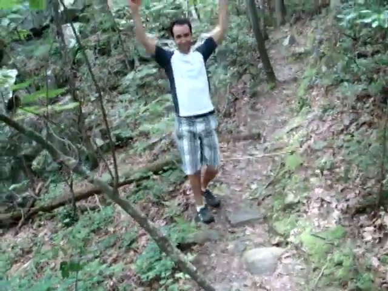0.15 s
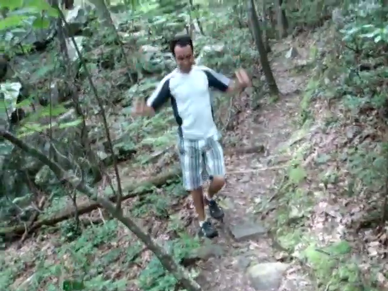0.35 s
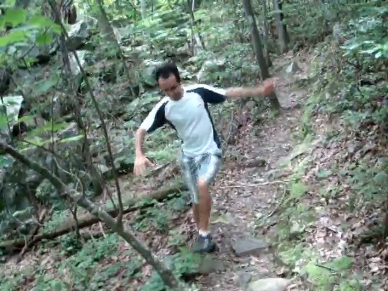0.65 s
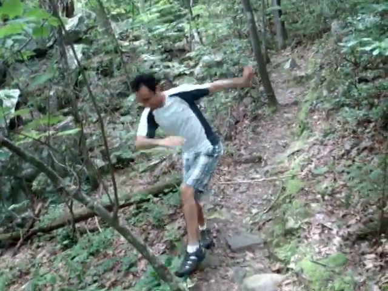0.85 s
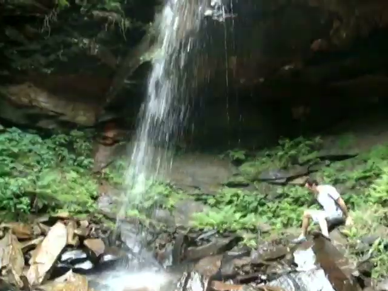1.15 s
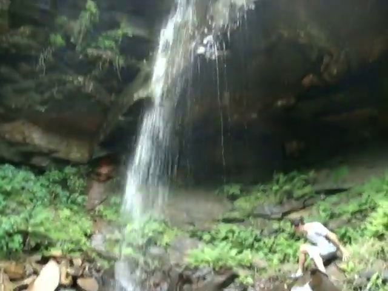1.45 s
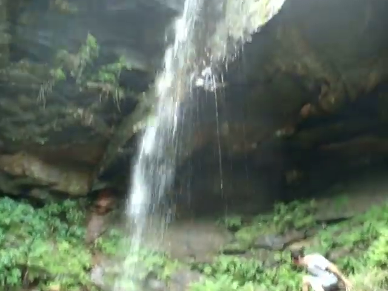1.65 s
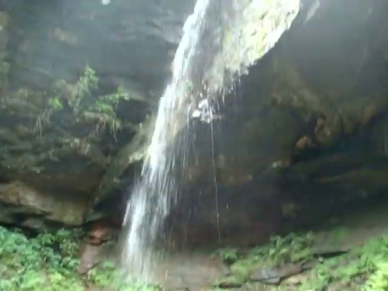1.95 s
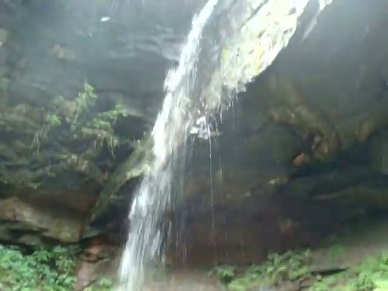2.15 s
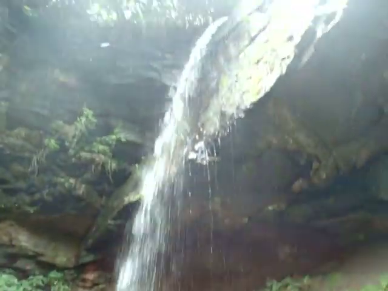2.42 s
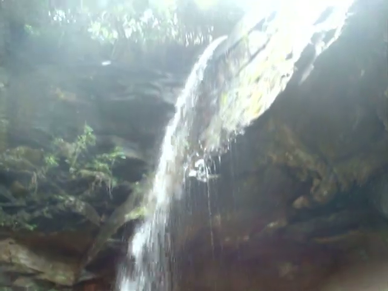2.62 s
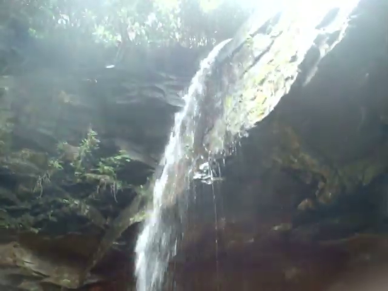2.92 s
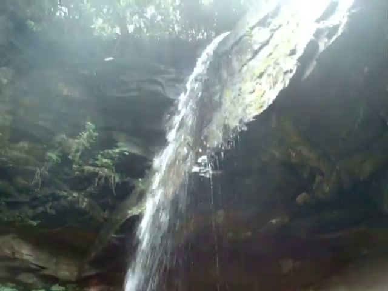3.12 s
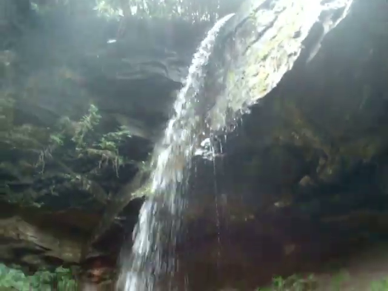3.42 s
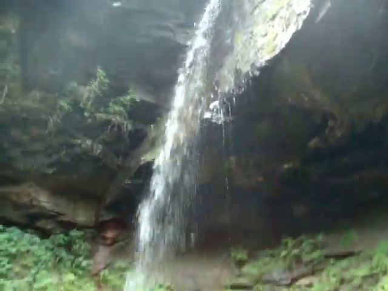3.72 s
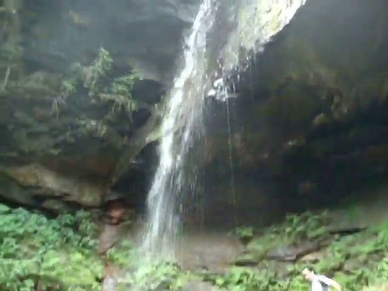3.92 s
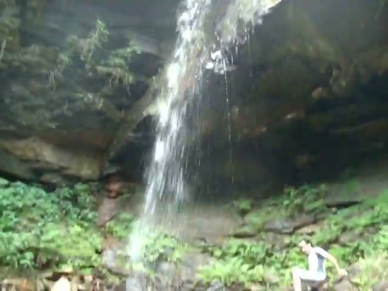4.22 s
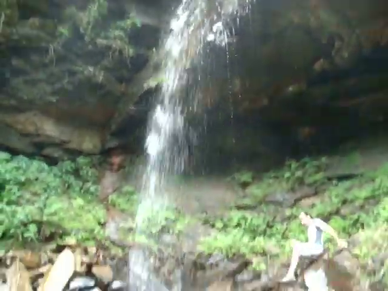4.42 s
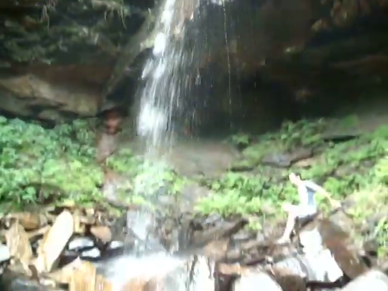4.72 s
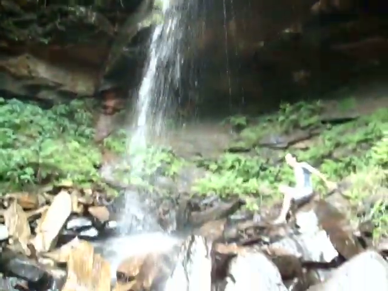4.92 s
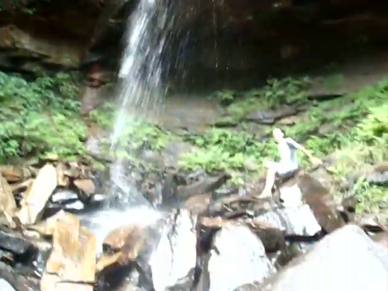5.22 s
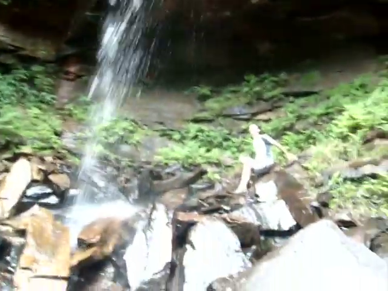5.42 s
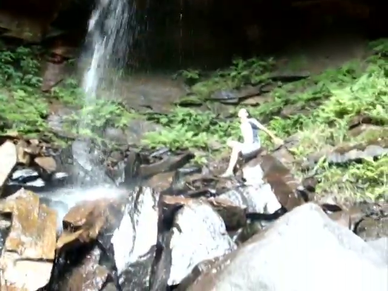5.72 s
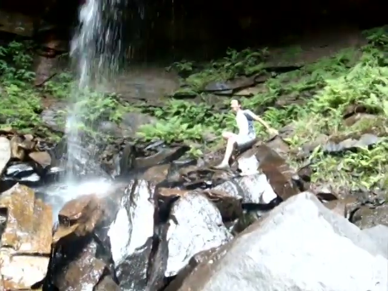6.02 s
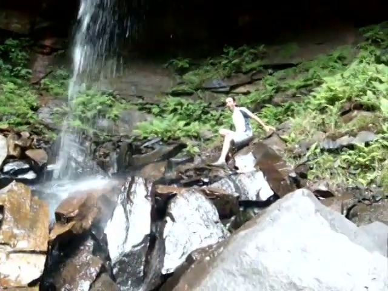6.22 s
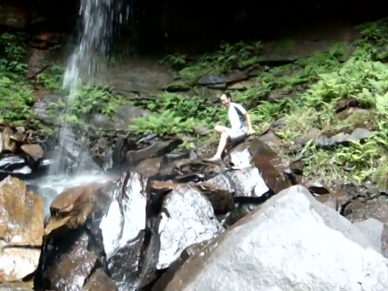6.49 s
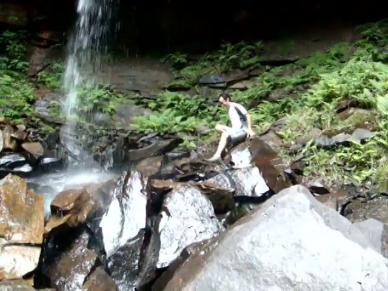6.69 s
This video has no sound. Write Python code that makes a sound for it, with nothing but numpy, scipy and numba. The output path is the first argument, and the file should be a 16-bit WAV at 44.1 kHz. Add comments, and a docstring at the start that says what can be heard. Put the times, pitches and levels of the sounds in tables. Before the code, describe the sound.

The sound opens on a quiet forest path with a soft, even hush and a barely audible high electronic whine. Small twigs tick and snap faintly underfoot, the clearest at about 0.1 seconds. At 0.8 seconds everything cuts to complete silence.

At about 1.1 seconds a close waterfall starts abruptly, much louder, and runs until the end near 6.9 seconds. Its spray is a bright, steady roar with slight flutter and swells, filled with dense pattering drops. Sharp, short slaps of water on wet boulders stand out around 1.5 and 2.1 seconds, cluster from 4 to 4.3, and return between 5.3 and 6.3 seconds. Brief gurgles, rising slightly in pitch, are scattered beneath the spray, clearest near 2.4 and 5.3 seconds. Everything is heard in mono through one small microphone, thin in the bass and missing the very highest treble.

```python
"""Forest path and waterfall

On a quiet path, twigs ring and snap underfoot over a forest hush and a thin camera whine.
After a gap of silence a tall waterfall is close by: its spray roars as broadband noise, drops
slap wet boulders as brief damped rings, and trapped air pockets resonate as rising gurgles.
One microphone, thin in the bass, hears both places."""
import sys
import numpy as np
from scipy import signal
from scipy.fft import rfft, irfft
from scipy.io import wavfile
from scipy.ndimage import uniform_filter1d, map_coordinates
from numba import njit

SR = 44100
rng = np.random.default_rng(int(sys.argv[2]) if len(sys.argv) > 2 else 0)


def master_out(mix):
    """Clip the mix to full scale and print it as 16-bit PCM to the path in sys.argv[1]."""
    frames = np.transpose(np.atleast_2d(mix))
    ceiling = np.clip(frames, -1, 1)
    pcm = np.round(ceiling * 32767).astype(np.int16)
    wavfile.write(sys.argv[1], SR, pcm)


N = 302124
T = np.arange(N) / SR
PATH_END_S, FALL_START_S = .763, 1.063
BASS_CUT_HZ, EDGE_HZ, TOP_HZ = 111, 10000, 10520

# Spectrum of the forest hush. Each row: frequency in Hz, relative spectral density in dB.
HUSH_SPECTRUM = [(15, -57), (25, -24), (65, -34), (107, -14.5), (195, -9.5), (244, -7), (467, -3),
                 (504, -7), (557, -5), (1810, -10), (1950, -12), (4670, -17.5), (7150, -20), (7710, -19),
                 (9900, -24), (12900, -59), (21800, -120)]
# Envelope of the hush. Each row: time in seconds, level in dB.
HUSH_ENVELOPE = [(0, -43), (.04, -47.5), (.3, -46), (.76, -47)]
# Taps and snaps underfoot. Each row: start in seconds, level in dB, ring frequency in Hz,
# 60 dB decay time in seconds, crack level in dB relative to the ring, crack frequency in Hz.
TWIG_TAPS = [(.001, -35, 700, 0.011, -6, 2000), (0.0272, -32.5, 870, 0.015, 3, 3400),
             (.086, -21.5, 5330, 0.0072, -6, 4770), (.231, -37, 824, 0.013, 2, 3100),
             (.257, -33, 988, .012, -6, 1500), (.274, -32, 1000, .014, 4, 2100),
             (.2745, -34, 3600, .008, -5, 3000), (.468, -35, 990, 0.014, -7, 1600),
             (0.554, -34, 910, 0.015, -4, 1700), (0.608, -33, 2800, 0.0078, 2, 4600)]
# Spectrum of falling water. Each row: frequency in Hz, relative spectral density in dB.
WATER_SPECTRUM = [(18, -69), (30, -33), (120, -29), (172, -19.5), (214, -9.5), (348, -9), (383, -5),
                  (525, -6.5), (794, -2.5), (1090, -2.5), (1390, -0.5), (2000, -5), (5270, 0.5),
                  (8770, -1.5), (9900, -3.5), (12900, -37), (21800, -120)]
# Flow of the fall. Each row: time in seconds, level in dB, then relative low roar and top spray in dB.
WATER_FLOW = [(1.07, -25, 1, -0.5), (1.2, -23.5, 0, 1), (1.5, -23, -0.5, -2), (1.8, -23.5, 0.5, -0.5),
              (2.2, -24, 0.5, 0), (2.8, -23, 1, 1), (3.4, -24.5, 3.5, 2.5), (3.7, -21, -1, 0.5),
              (4.1, -23, 2, 0), (4.6, -20.5, -0.5, -2), (4.82, -24, 0.5, 2), (5.25, -22, 0.5, -1.5),
              (5.45, -22.5, -0.5, 0.5), (5.9, -24, 0.5, 0.5), (6.0, -25, 1, 0), (6.28, -24, 0.5, 2),
              (6.5, -23, -0.5, 0), (6.84, -25, 1, 0.5)]
# Clearest air pockets between the boulders. Each row: start in seconds, level in dB, pitch in Hz.
AIR_POCKETS = [(1.118, -24, 397), (1.35, -20, 1690), (1.837, -18, 753), (1.85, -21, 480),
               (2.15, -22.5, 393), (2.371, -14, 797), (2.528, -21, 1400), (2.677, -18, 1500),
               (2.741, -15, 1670), (3.409, -19.5, 980), (3.466, -22.5, 474), (3.628, -23, 560),
               (3.952, -24, 416), (3.965, -21, 1790), (4.071, -17, 1420), (4.547, -20.5, 579),
               (4.551, -20, 1410), (5.14, -19, 1520), (5.216, -21, 1360), (5.257, -13, 1406),
               (5.26, -18, 1690), (5.31, -21, 1800), (5.567, -22, 390), (6.09, -19, 790), (6.238, -28, 334),
               (6.288, -17, 1400), (6.51, -22.5, 416), (6.67, -25.5, 385)]
# Loudest blows of water on rock. Each row: time in seconds, level in dB, centre frequency in Hz.
ROCK_SLAPS = [(1.1634, -8, 4680), (1.4415, -15, 5270), (1.4484, 2, 4300), (1.547, 1, 5550),
              (1.5814, -15, 5380), (1.6861, -11, 5570), (1.9766, -10, 5750), (2.1184, -1, 5800),
              (2.153, 2, 5830), (3.9654, 3.5, 4000), (4.017, 4, 5010), (4.0663, 0, 2090), (4.121, -1, 2220),
              (4.137, 1, 4860), (4.3256, 3, 4650), (4.4302, -7, 4830), (4.5634, -4, 4790),
              (4.659, -8, 2520), (5.2131, -10, 5380), (5.3482, 2.5, 3360), (5.48, -2, 3000),
              (5.7012, -1, 4200), (5.8506, -1, 3400), (6.1594, -20, 5350), (6.3047, 2, 4660),
              (6.506, -8, 5710)]
# Echo off the camera holder's body; the lag shrinks as the camera tilts up and grows as it comes down.
# Each row: time in seconds, lag in ms, gain in dB.
BODY_REFLECTION = [(1.06, 1.1, -19), (1.45, .89, -19), (2.0, 0.83, -19), (2.45, 0.756, -16),
                   (3.2, 0.736, -23), (4.3, 0.83, -15.5), (5.3, .93, -20), (6.85, 1.03, -18)]


def undb(db):
    """Amplitude ratio of a level in dB."""
    return 10 ** (np.asarray(db) / 20)


def density_db(spectrum, hz):
    """Spectral density interpolated in log frequency, held flat from just below the treble edge."""
    row_hz, db = np.transpose(spectrum)
    return np.interp(np.log(np.minimum(hz, EDGE_HZ - 200)), np.log(row_hz), db)


def flicker(rate_hz):
    """Low-pass random modulation: held values, smoothed twice, with a spread near 1."""
    hold = int(SR / rate_hz)
    steps = np.repeat(rng.standard_normal(N // hold + 1), hold)
    return 1.16 * uniform_filter1d(uniform_filter1d(steps, hold), hold)[:N]


def noise_bands(spectrum, flicker_db, tilt_db=lambda hz: 0, rate_hz=30):
    """Third-octave noise bands under amplitude modulation that is partly shared between neighbours."""
    hz = np.maximum(np.fft.rfftfreq(N, 1 / SR), 1)
    coloured = rfft(rng.standard_normal(N)) * undb(density_db(spectrum, hz))
    out, wobble = 0, flicker(rate_hz)
    for band in np.arange(13, 41):
        window = np.cos(np.pi / 2 * np.clip(3 * np.log2(hz) - band, -1, 1)) ** 2
        wobble = .8 * wobble + .6 * flicker(rate_hz)
        gain = undb(tilt_db(2 ** (band / 3)) + flicker_db * wobble)
        out = out + irfft(coloured * window, N) * gain
    return out


def level(x, db):
    """Scale a signal to an RMS level in dB."""
    return x * undb(db) / np.sqrt(np.mean(x ** 2))


@njit
def ring(start, hz, t60, size, glide, rise):
    """Damped oscillators that swell over the fraction rise of their life and glide by the ratio glide."""
    out = np.zeros(N)
    for k in range(len(start)):
        life, first = int(t60[k] * SR) + 2, int(start[k] * SR)
        omega = 2 * np.pi * hz[k] / SR
        pole = np.exp(-np.log(1000.) / life + 1j * omega)
        bend = np.exp(1j * omega * (glide ** (1. / life) - 1))
        phasor = 1. + 0j
        for i in range(first, min(first + life, N)):
            out[i] += size[k] * phasor.imag * min(1., (i - first) / (rise * life))
            phasor *= pole
            pole *= bend
    return out


def forest_hush():
    """Ambient noise: a continuous spectrum under a slow envelope."""
    times, db = np.transpose(HUSH_ENVELOPE)
    return level(noise_bands(HUSH_SPECTRUM, flicker_db=.8), 0) * undb(np.interp(T, times, db))


def twig_taps():
    """Impact excites a damped vibration; the fracture of a twig or leaf adds a shorter click."""
    start, db, hz, t60, crack_db, crack_hz = np.transpose(TWIG_TAPS)
    crack_t60 = np.full(len(start), .0037)
    taps = ring(start, hz, t60, undb(db), glide=.88, rise=.024)
    return taps + ring(start, crack_hz, crack_t60, undb(db + crack_db), glide=.99, rise=.022)


def camera_whine(hz=7569, frame_hz=29.97, duty=.95):
    """A tone restarted on every picture frame forms spectral lines spaced at the frame rate."""
    age = (T - .003) % (1 / frame_hz)
    pulse = np.sin(np.pi * np.minimum(age * frame_hz / duty, 1)) ** .5
    return level(np.sin(2 * np.pi * hz * age) * pulse, db=-63)


def spray_roar(low_db, top_db):
    """Countless impacts add incoherently into noise, whose low and top bands swell separately."""
    tilt_db = lambda hz: low_db if hz < 1600 else top_db if hz > 7000 else 0
    return level(noise_bands(WATER_SPECTRUM, flicker_db=1.28, tilt_db=tilt_db), .47)


def drops(count, low_hz, high_hz, cycles, spread_db, glide, rise, surge_db):
    """Shot noise of drops or bubbles: randomly timed rings, a few much louder, all raised by a surge."""
    when, pitch, size, polarity = rng.random((count, 4)).T
    start = when * (N - 1) / SR
    hz = low_hz * (high_hz / low_hz) ** pitch
    band_db = density_db(WATER_SPECTRUM, hz) + 10 * np.log10(hz)  # energy per octave
    db = band_db - spread_db * np.log(size + .015) + surge_db[(start * SR).astype(int)]
    return level(ring(start, hz, cycles / hz, np.sign(polarity - .5) * undb(db), glide, rise), 0)


def gurgles():
    """Air pockets resonate; each splits off a bubble of near pitch, and beating roughens the note."""
    start, db, hz = np.transpose(AIR_POCKETS)
    t60 = .063 * (hz / 1000) ** -.31  # small pockets die sooner
    lag, detune = rng.standard_normal((len(start), 2)).T
    split_start, split_hz = start + .008 * np.abs(lag), hz * (1 + .0725 * detune)
    notes = ring(start, hz, t60, undb(db), glide=1.12, rise=.066)
    return notes + ring(split_start, split_hz, t60, undb(db - 4.5), glide=1.09, rise=.24)


def slaps(patter, cycles=7.1, spatter_t60=.1):
    """Each blow on rock is a heavily damped ring and throws up a spatter that decays exponentially."""
    times, db, hz = np.transpose(ROCK_SLAPS)
    start = times + .001  # each slap sounds one millisecond after its listed time
    blows = ring(start, hz, cycles / hz, undb(db), glide=1., rise=.11)
    impulses = np.zeros(N)
    impulses[(start * SR).astype(int)] = undb(db - 23)
    decay = np.exp(-np.log(1000) / (spatter_t60 * SR))
    spatter = signal.lfilter([1], [1, -decay], impulses) * patter[::-1]
    return blows + spatter


def waterfall():
    """Superposition of spray noise, impacts on rock and bubble resonances."""
    times, *columns = np.transpose(WATER_FLOW)
    flow_db, low_db, top_db = (np.interp(T, times, column) for column in columns)
    roar = spray_roar(low_db, top_db) * undb(flow_db)
    surge_db = 1.04 * flicker(45)  # the sheet breaks into clumps that land in quick surges
    patter = drops(35000, 1623, 7420, cycles=8.7, spread_db=4.5, glide=.96, rise=.3, surge_db=surge_db)
    bubbles = drops(3000, 226.3, 2227, cycles=31.3, spread_db=4, glide=1.23, rise=.15, surge_db=low_db)
    pockets = drops(250, 302.5, 1910, cycles=58, spread_db=1, glide=1.07, rise=.12, surge_db=low_db)
    clumps = drops(400, 2550, 6540, cycles=2.7, spread_db=4, glide=1., rise=.2, surge_db=surge_db)
    grains = undb(-2.5) * patter + undb(-13.5) * bubbles + undb(-20) * pockets + undb(-15.5) * clumps
    splashes = grains * undb(flow_db) + gurgles() + slaps(patter)
    # the microphone passes little of their bass
    bass_cut = signal.butter(6, BASS_CUT_HZ, "high", fs=SR, output="sos")
    return roar + signal.sosfilt(bass_cut, splashes)


def body_echo(x, low_hz=2100, high_hz=7400):
    """Interference with a sliding reflection combs the treble; long waves diffract past the body."""
    times, lag_ms, db = np.transpose(BODY_REFLECTION)
    treble = signal.sosfiltfilt(signal.butter(1, [low_hz, high_hz], "band", fs=SR, output="sos"), x)
    lag_samples = np.interp(T, times, lag_ms) * SR / 1000
    echo = map_coordinates(treble, [np.arange(N) - lag_samples], order=3)
    return x + undb(np.interp(T, times, db)) * echo


def scene():
    """The path, silence, then the waterfall, alike in both channels."""
    path = (forest_hush() + twig_taps() + camera_whine()) * (T < PATH_END_S)
    fall = body_echo(waterfall()) * (T >= FALL_START_S)
    return np.tile(path + fall, (2, 1))


def record(dry, shelf_db=-20):
    """Band limiting: the small camera lowers the top treble in a shelf, then cuts it steeply."""
    hz = np.fft.rfftfreq(N, 1 / SR)
    shelf = undb(shelf_db * np.clip((hz - EDGE_HZ + 30) / 150, 0, 1))
    top_cut = signal.ellip(12, .2, 80, TOP_HZ, fs=SR, output="sos")
    gate = np.abs(dry) > 0  # the gap between the two places stays silent
    return signal.sosfilt(top_cut, irfft(rfft(dry) * shelf, N) * gate)


dry = scene()
out = record(dry)
master_out(out)
```